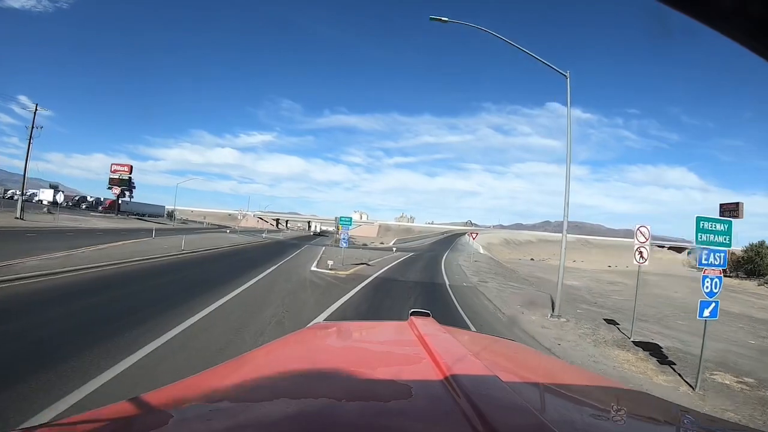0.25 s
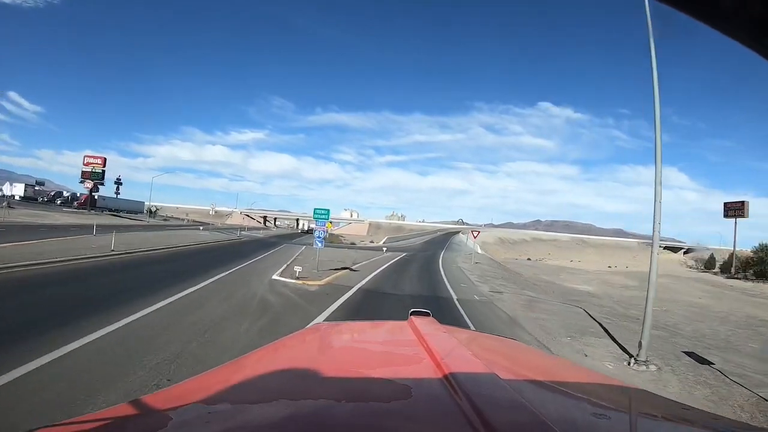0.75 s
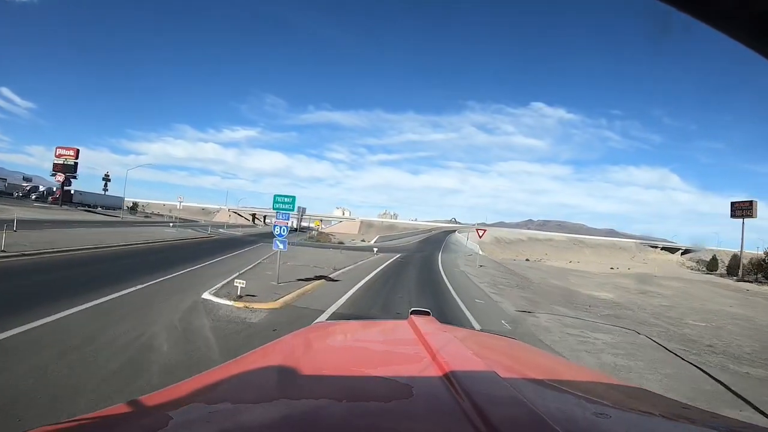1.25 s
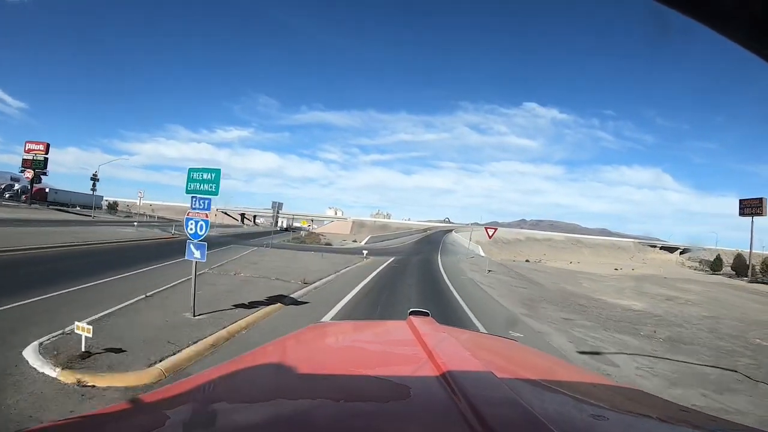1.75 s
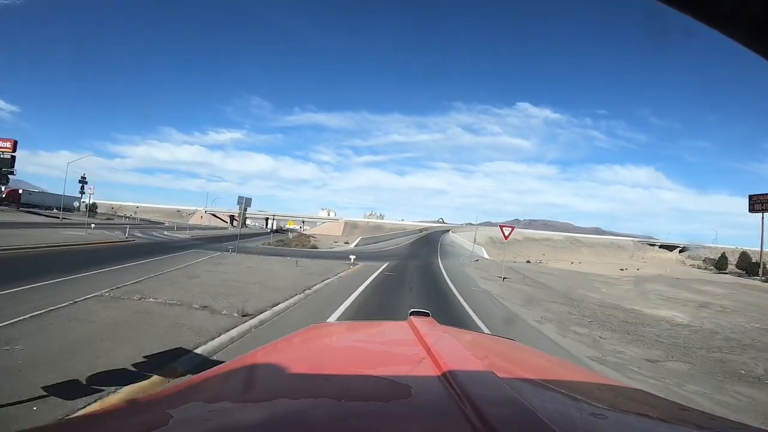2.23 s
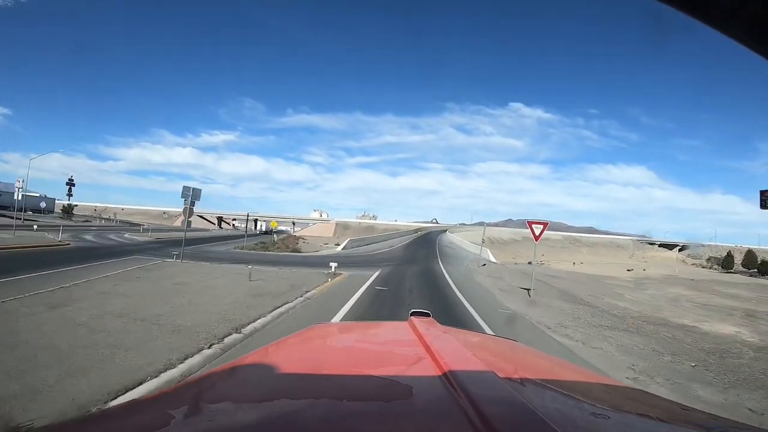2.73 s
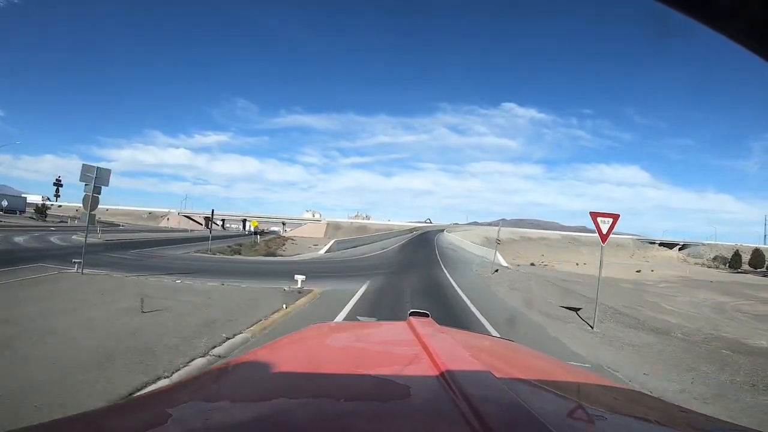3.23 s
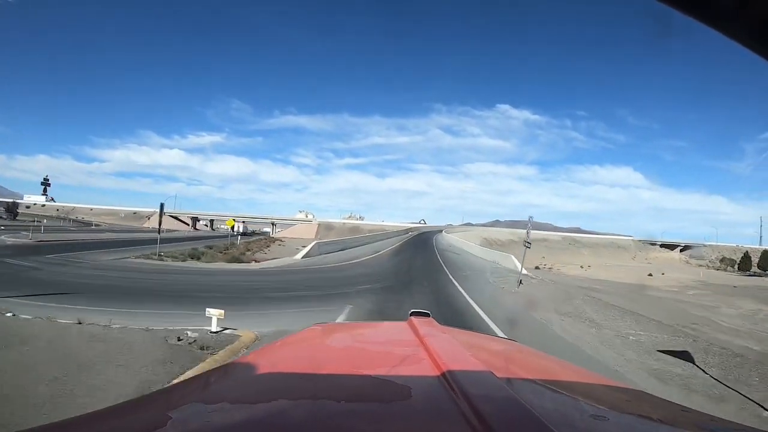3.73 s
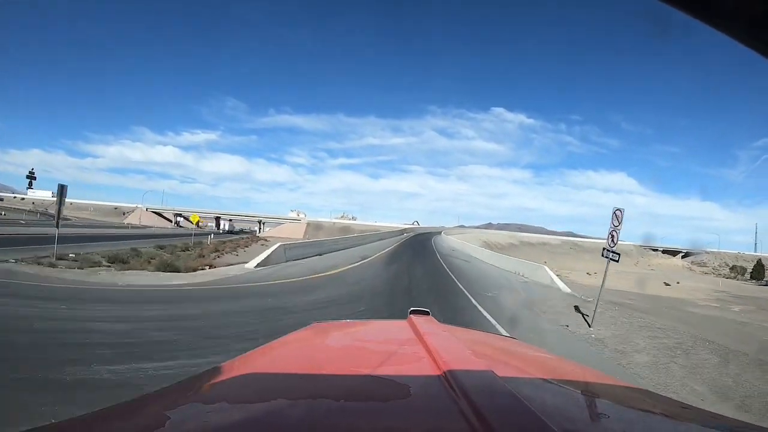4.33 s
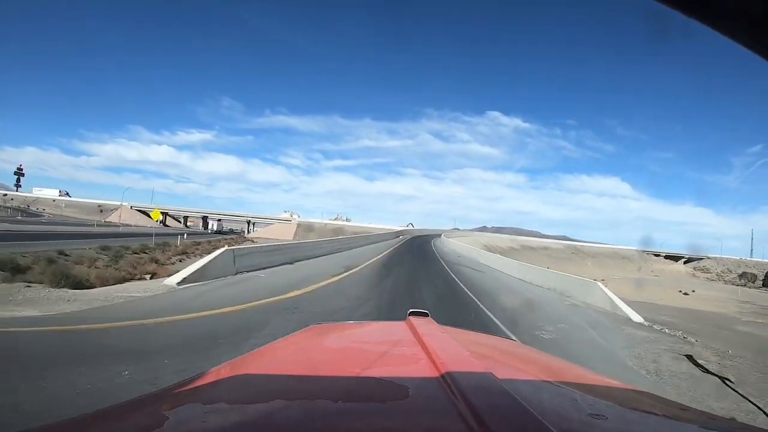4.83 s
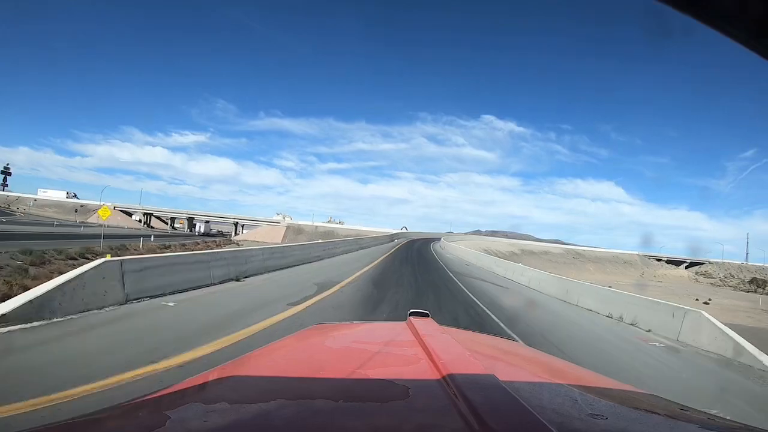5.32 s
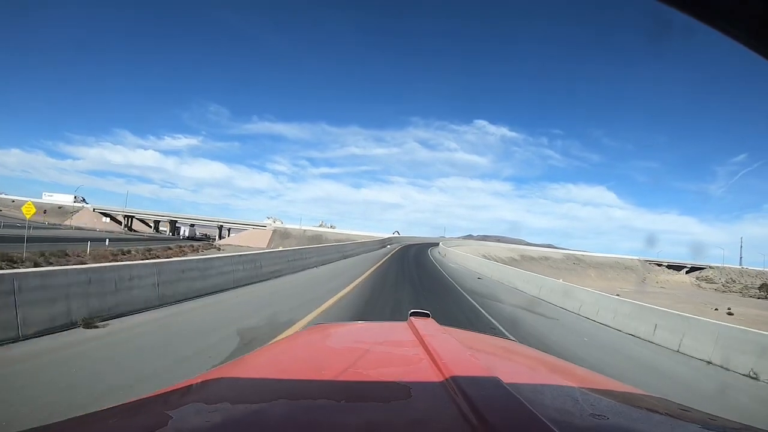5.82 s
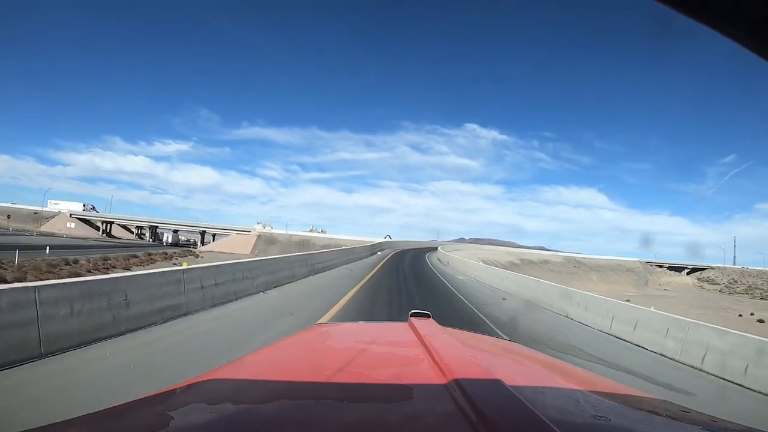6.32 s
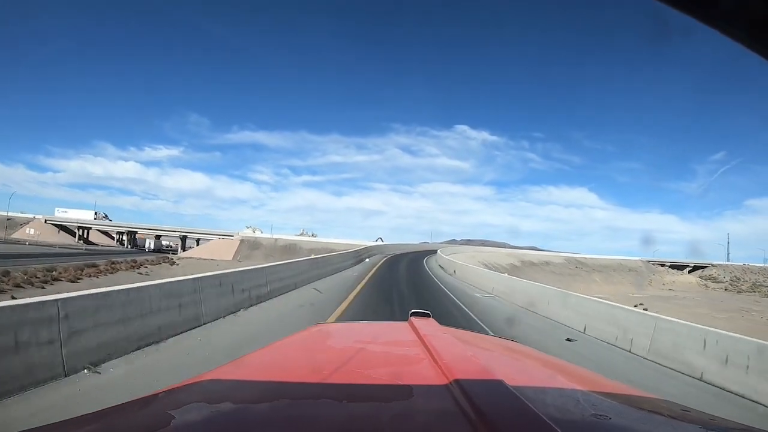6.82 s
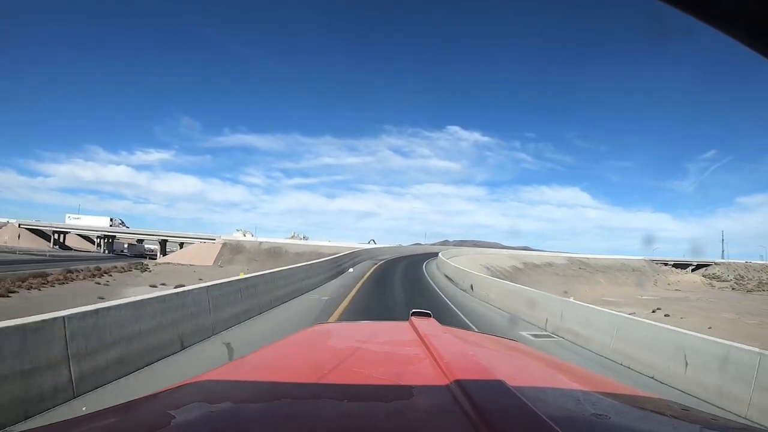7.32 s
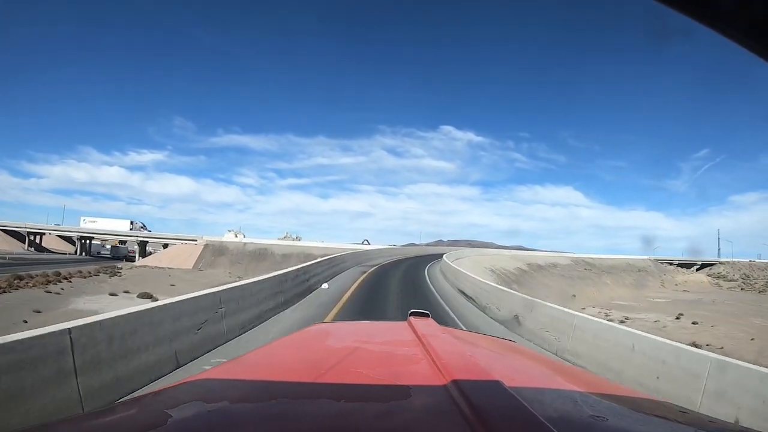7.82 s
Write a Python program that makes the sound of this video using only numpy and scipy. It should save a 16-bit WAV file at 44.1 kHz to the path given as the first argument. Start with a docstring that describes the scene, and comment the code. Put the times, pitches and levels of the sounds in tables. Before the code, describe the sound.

A heavy diesel truck accelerates, heard from inside the cab. The engine booms and clatters over a steady low road rumble, with a high turbo whistle above it. Twice the engine eases off for a gear shift, the whistle sinks, the throttle blips and the pull resumes with the whistle climbing again. Faint gear whine, thin panel ringing, small trim squeaks and ticks and a few short air puffs come through.

```python
"""A diesel truck from inside the cab.

A heavy six-cylinder engine pulls through two gear shifts. Its firing harmonics excite the cab's modes,
combustion clatter follows the load, gear teeth whine and two turbo stages whistle. Thin panels ring,
mostly on the right, while air valves puff and trim ticks and squeaks over the rumble of the road."""
import sys
import numpy as np
from scipy import signal
from scipy.fft import rfft, irfft
from scipy.io import wavfile
from scipy.ndimage import uniform_filter1d

SR = 44100
rng = np.random.default_rng(int(sys.argv[2]) if len(sys.argv) > 2 else 0)


def digitize_waveform(pressure):
    """Quantize a signal to 16-bit integers and store it at the path in sys.argv[1].

    Rows of a 2-D input are taken as channels; values are limited to [-1, 1].
    """
    field = np.atleast_2d(pressure).T
    bounded = np.clip(field, -1, 1)
    quanta = np.round(bounded * 32767).astype(np.int16)
    wavfile.write(sys.argv[1], SR, quanta)


N = 355446

# Noise field in the cab. Each row: frequency in Hz, left-right correlation.
COHERENCE = [(60, 0.86), (250, 1), (500, 0.8), (1000, 0.41), (2100, 0.41), (4400, 0.47), (9000, .0)]
# Balance of that field. Each row: frequency in Hz, left minus right in dB.
BALANCE = [(60, -1.5), (180, 1.5), (320, -3.5), (560, -5), (970, -0.7), (2900, -1.3), (9000, 0.5)]
# Standing waves in the cab. Each row: frequency in Hz, phase of right over left in radians.
STANDING_PHASE = [(60, 0.22), (160, .08), (250, 0.13), (400, 0.31)]
# Five noise spectra. Each row: frequency in Hz, relative spectral density in dB.
ROAD_SPECTRUM = [(20, -15.5), (30, 3), (55, -2.5), (80, -3.5), (110, 1.5), (180, -7), (250, -5.5),
                 (310, -15), (600, -27.5), (800, -26.5), (2100, -38), (4000, -51.5), (7000, -54),
                 (9500, -80.5), (16000, -100)]
HISS_SPECTRUM = [(4000, -30), (6000, -2), (8000, 0), (10500, -3), (11200, -22), (16000, -40)]
DULL_SPECTRUM = [(700, -23), (1600, -0.5), (2800, 3.5), (4500, -11.5), (7000, -10), (10000, -35.5),
                 (16000, -43.5)]
BRIGHT_SPECTRUM = [(1500, -29), (4000, 3.5), (6000, -1), (8500, 0), (10500, -8), (12500, -13.5),
                   (16000, -36.5)]
CLATTER_SPECTRUM = [(60, -7.5), (150, 2), (300, 4.5), (420, 0), (600, -9.5), (850, -7), (1100, -9),
                    (1400, -20), (1650, -15), (2800, -25), (3600, -29.5), (6000, -35.5), (8500, -42),
                    (11000, -79.5), (16000, -89.5)]
# Rubbing trim. Each row: centre in seconds, pitch in Hz, glide in Hz per second, peak in dB.
TRIM_SQUEAKS = [(1.245, 2420, -1500, -43), (1.45, 2420, 0, -48), (1.6, 2430, -1000, -42),
                (1.6, 4900, -7000, -51), (1.73, 2450, 0, -42), (2.905, 4700, 0, -50), (3.45, 4000, 0, -47),
                (3.895, 4200, 0, -45), (4.5, 2250, -2000, -44)]
# Air valves and trim ticks. Each row: start in seconds, level in dB before the envelope,
# decay time in seconds, bright share from 0 to 1, left minus right in dB.
PUFFS_AND_TICKS = [(1.472, -44, .005, .9, 7), (1.78, -38.5, 0.2, 0.36, -1), (2.47, -40, 0.0062, 0.88, 5),
                   (2.822, -45, 0.0078, 1, -5), (3.005, -46, 0.0076, 0.98, -4),
                   (3.168, -45, 0.012, 0.99, -1), (3.428, -31, 0.041, 0.67, 1), (3.893, -43, .012, .9, -2),
                   (4.006, -44, 0.009, .9, 4), (4.487, -45, 0.018, 0, 0), (6.4, -26, .012, 0.22, 3),
                   (7.248, -54, .015, 0.82, 0), (7.414, -54, .012, 0.76, 6), (7.663, -38, 0.027, 0.91, -1)]
# Swells of the loudest panel. Each row: centre in seconds, level in dB, half-width in seconds.
PANEL_BURSTS = [(.1, -46, 0.075), (0.54, -41.5, 0.1), (0.749, -42.5, 0.062), (.95, -41.5, 0.049),
                (1.492, -48, 0.065), (1.956, -50, 0.2), (2.422, -40.5, .14), (2.9, -54.5, 0.16),
                (3.402, -51.5, .08), (3.8, -41.5, 0.042), (4.198, -49.5, .1), (5.195, -44, 0.31),
                (5.949, -52, 0.084), (6.7, -45, 0.086), (7.6, -47, 0.044), (7.777, -41.5, 0.065)]
# Other panels. Each row: frequency in Hz, bandwidth in Hz, dB over load, left minus right in dB.
QUIET_PANELS = [(1739, 9, -17.5, -1), (2430, 20, -27, 0)]
# High-pressure turbo speed. Each row: time in seconds, whistle pitch in Hz.
TURBO_PITCH = [(0.0, 6350), (0.25, 7080), (0.4, 7260), (0.52, 7350), (0.66, 7370), (0.8, 7210), (1.0, 6410),
               (1.2, 5313), (1.4, 4590), (1.7, 4300), (2.0, 4400), (2.6, 5580), (3.3, 7290), (3.6, 7949),
               (3.8, 8120), (3.9, 8120), (4.0, 7882), (4.2, 6890), (4.4, 5834), (4.55, 5103), (4.72, 4603),
               (5.0, 4443), (5.4, 4876), (6.6, 7494), (6.9, 7944), (7.3, 8280), (7.7, 8520), (8.06, 8500)]
# Its whistle. Each row: pitch in Hz, level in dB spooling up, level in dB running down.
WHISTLE_LEVELS = [(4300, -75, -72), (4600, -72, -58), (5420, -69, -55.5), (5650, -57, -58),
                  (6130, -43, -52), (6450, -44.5, -49), (7110, -38.5, -48), (7370, -34.5, -40),
                  (7360, -37.5, -43.5), (7930, -40.5, -39), (8279, -43.5, -46), (8595, -49, -49)]
# Second turbo stage. Each row: pitch in Hz, level in dB.
BREATH_LEVELS = [(7200, -64), (9500, -65.5), (10700, -69), (11800, -80), (12500, -95)]
# Tooth meshes. Each row: multiple of the firing rate, relative level in dB, start and end in seconds.
GEAR_MESHES = [(35, 0, 0, 1.0), (35, 2.5, 1.75, 4.15), (35, -7, 4.9, 8.2), (70, -13, 1.9, 3.5),
               (70, -13, 4.6, 6.6), (52.3, -1, 1.75, 2.25), (52, -3, 5.0, 5.55), (48.8, -4, 6.5, 7.7),
               (17.2, 6, 5.6, 7.4)]
# Engine running. Each row: time in seconds, firing rate in Hz, load as a reference level in dB.
RATE_AND_LOAD = [(0.0, 73.9, -34.5), (0.4, 77.5, -36), (0.65, 78.06, -37.5), (0.9, 77.5, -41),
                 (1.1, 74.02, -43), (1.4, 65.3, -45.5), (1.5, 66.27, -40), (1.6, 69.82, -41.5),
                 (1.72, 71.0, -37), (1.85, 67.5, -38), (1.92, 69.3, -35), (2.2, 70.45, -35.5),
                 (2.8, 74.0, -34), (3.3, 78.37, -34.5), (3.65, 80.5, -37), (3.85, 80.9, -38.5),
                 (4.08, 78.87, -40), (4.2, 76.66, -46), (4.7, 66.63, -44.5), (4.9, 71.4, -37.5),
                 (5.05, 67.28, -38.5), (5.12, 68.64, -35), (5.7, 70.26, -36.5), (6.4, 73.4, -34.8),
                 (7.4, 77.18, -36), (8.06, 78.8, -37)]
# Gear shifts. Each row: times in seconds at which the foot lifts, throttle blips and clutch catches.
SHIFT_TIMES = [(1.003, 1.53, 1.8), (4.13, 4.78, 4.97)]
# Cab modes. Each row: centre in Hz, bandwidth in Hz, peak in dB over load.
CAB_MODES = [(107, 8.4, 1.5), (134, 20, -2.5), (161.4, 17, 8.5), (212.3, 12, 7), (238, 39, -1.5),
             (428, 38, -7), (480, 29, -13.5)]
# Upper engine orders. Each row: multiple of the firing rate, dB over load before the cab resonance.
UPPER_ORDERS = [(5, 6.8), (6, 2.4), (16 / 3, -2), (13 / 3, 0.82), (6.4, -8.5)]
MAIN_ORDERS = (1, 2, 3, 11 / 3, 4, 8 / 3)  # multiples of the firing rate; 11/3 is the fan blade tone
# Pulling at full load. Each row: firing rate in Hz, then the level in dB of each main order.
PULLING_DB = [(67.6, -18.5, -26, -22.5, -23, -27, -41), (69.6, -19, -18.5, -19, -22, -27.5, -41),
              (71.52, -19, -23, -19.5, -26, -33, -41.5), (73.37, -19, -27, -17.5, -34.5, -31.5, -38),
              (75.2, -21, -20.5, -19.5, -40.5, -29, -28), (76.2, -23, -19, -16.5, -41.5, -31, -24.5),
              (77.5, -28.5, -13, -15.5, -42.5, -31, -24), (77.95, -26, -12, -19, -45, -27, -25.5),
              (78.92, -25, -12, -18.5, -41, -29, -25), (80.4, -29, -11, -19.5, -28, -28, -34)]
# Part load. Each entry: dB that a main order loses per dB below full load.
LOAD_SLOPES = [.8, 0.33, 2.35, 0.51, 0.67, 1.3]
# Three stages of a shift. Each entry: level in dB of a main order.
COASTING_DB = [-30.5, -31, -43, -29, -47, -41.5]
BLIPPING_DB = [-23.5, -18, -27.5, -22, -42, -35.5]
CATCHING_DB = [-20, -30, -27, -26, -20, -39]

ROAD_DB, HISS_DB, FULL_LOAD_DB = -23, -64.5, -35.4
CLATTER_DB, GEAR_DB, PANEL_DB = 9, -20.5, -13  # over load
TIME = np.arange(N) / SR


def undb(db):
    """Amplitude grows tenfold for every 20 dB."""
    return 10 ** (np.asarray(db) / 20)


def per_sample(table):
    """Linear interpolation gives each column of a timed table a value at every sample."""
    times, *columns = np.transpose(table)
    return [np.interp(TIME, times, column) for column in columns]


def per_bin(table):
    """Interpolation on a logarithmic frequency axis gives a value at every Fourier bin."""
    hz, value = np.transpose(table)
    return np.interp(np.log(np.fft.rfftfreq(N, 1 / SR) + 1), np.log(hz), value)


def waver(rate_hz):
    """Random steps, smoothed twice, form a slow fluctuation of unit deviation."""
    hold = int(SR / rate_hz)
    steps = np.repeat(rng.standard_normal(N // hold + 1), hold)
    smooth = uniform_filter1d(uniform_filter1d(steps, hold), hold)[:N]
    return smooth / smooth.std()


def band_envelope(width_hz):
    """Modulation by this complex noise of unit rms spreads a pure tone into a band."""
    noise = rng.standard_normal(N) + 1j * rng.standard_normal(N)
    noise = signal.sosfilt(signal.butter(2, width_hz / 2, fs=SR, output="sos"), noise)
    return noise / np.sqrt(np.mean(abs(noise) ** 2))


def phasor(hz):
    """Phase is the integral of frequency; the result is a unit complex tone."""
    return np.exp(2j * np.pi * np.cumsum(hz) / SR)


def breathy_band(hz, width_hz):
    """Independent random modulation in each channel gives an incoherent band around a pitch."""
    return (phasor(hz) * np.array([band_envelope(width_hz) for _ in "LR"])).real


def cab_noise(spectrum, gate=1.):
    """A noise field of unit rms, coherent between two points in the bass but not in the treble."""
    mid, side = rfft(gate * rng.standard_normal((2, N)))
    coherence, lean_db = per_bin(COHERENCE), per_bin(BALANCE) / 2
    mid, side = mid * np.sqrt(1 + coherence), side * np.sqrt(1 - coherence)
    channels = np.array([(mid + side) * undb(lean_db), (mid - side) * undb(-lean_db)])
    noise = irfft(channels * undb(per_bin(spectrum)), N)
    return noise / noise.std()


def resonance(hz, centre_hz, width_hz, peak_db):
    """The power response of a damped mode follows a Lorentzian curve."""
    return undb(2 * peak_db) / (1 + (2 * (hz - centre_hz) / width_hz) ** 2)


def standing_phase(hz):
    """Standing waves shift the phase of the right channel against the left."""
    return np.array([[0], [1]]) * np.interp(hz, *np.transpose(STANDING_PHASE))


def road():
    """Broadband noise: the road rumbles in the bass, wind and tyres hiss in the treble."""
    rumble = cab_noise(ROAD_SPECTRUM) * undb(ROAD_DB + 1.2 * waver(5))
    hiss = cab_noise(HISS_SPECTRUM) * undb(HISS_DB + .87 * waver(4))
    return rumble + hiss


def trim_squeaks(half_width_s=.016):
    """Friction in the trim gives brief chirps under Gaussian envelopes."""
    out = 0
    for centre, hz, glide, db in TRIM_SQUEAKS:
        t = TIME - centre
        envelope = undb(db) * np.exp(-(t / half_width_s) ** 2)
        out = out + envelope * np.sin(2 * np.pi * (hz + glide * t / 2) * t)
    return out


def puffs_and_ticks():
    """Air valves and ticking trim emit noise transients; the longer ones open more slowly."""
    dull, bright = cab_noise(DULL_SPECTRUM), cab_noise(BRIGHT_SPECTRUM)
    out = 0
    for start, db, decay_s, share, pan_db in PUFFS_AND_TICKS:
        rise_s = max(.0005, .02 * (decay_s / .1) ** 2)
        age = np.clip(TIME - start, 0, None)
        envelope = (1 - np.exp(-age / rise_s)) * np.exp(-(age / decay_s) ** 2)
        gain = undb([[db + pan_db / 2], [db - pan_db / 2]])
        out = out + envelope * gain * (share * bright + (1 - share) * dull)
    return out


def panel_mode(hz, width_hz, pan_db):
    """A lightly damped mode under random forcing rings in a narrow band."""
    swing = band_envelope(width_hz)
    swing /= abs(swing) ** .5  # the swing evens out as the damping grows with it
    tone = (swing * np.exp(2j * np.pi * hz * TIME)).real
    return tone / tone.std() * undb([[pan_db / 2], [-pan_db / 2]])


def panels(load):
    """Forced vibration of thin panels follows the load; the loudest also swells in bursts."""
    bursts = sum(undb(db) * np.exp(-((TIME - centre) / span) ** 2) for centre, db, span in PANEL_BURSTS)
    level = (bursts + load * undb(PANEL_DB)) * undb(2.4 * waver(28))
    out = level * panel_mode(hz=1561, width_hz=10, pan_db=-13)
    for hz, width_hz, db, pan_db in QUIET_PANELS:
        out = out + load * undb(db + 6 * waver(3.509)) * panel_mode(hz, width_hz, pan_db)
    return out


def turbo_whistle(hz):
    """A blade-passing tone is firm while the wheel is driven and breaks up as it runs down."""
    blade_tone = phasor(hz * (1 + .003 * waver(25)))
    fall_hz_per_s = -uniform_filter1d(np.gradient(hz), 4000) * SR
    coast = np.clip(fall_hz_per_s / 4500, 0, 1)
    pitch, up_db, down_db = np.transpose(WHISTLE_LEVELS)
    down = np.sqrt(coast)
    db = (1 - down) * np.interp(hz, pitch, up_db) + down * np.interp(hz, pitch, down_db)
    firmness = .78 * (1 - .9 * coast)
    right_phase = np.array([[0], [1]]) * (2.16 + 1.5 * waver(6))
    steady = firmness * np.exp(1j * right_phase)
    flutter = np.sqrt(1 - firmness ** 2) * np.array([band_envelope(width_hz=140) for _ in "LR"])
    flicker_db = 2 * (1 + .76 * coast) * waver(22)
    whistle = undb(db + flicker_db) * (blade_tone * (steady + flutter)).real
    # running down, surging air spreads a band just below the whistle
    surge = coast ** 2 * undb(db - 7) * breathy_band(.93 * hz, width_hz=800)
    return whistle + surge


def turbo_breath(whistle_hz, ratio=1.66):
    """The second stage turns in step with the first, so its noise band keeps a constant pitch ratio."""
    hz = ratio * whistle_hz
    return undb(np.interp(hz, *np.transpose(BREATH_LEVELS))) * breathy_band(hz, width_hz=550)


def gear_whine(phase, load):
    """Meshing teeth sound at multiples of the firing rate, coming and going with the torque."""
    out = 0
    for order, db, start, end in GEAR_MESHES:
        gate = np.clip(np.minimum(TIME - start, end - TIME) / .1, 0, 1)
        level = load * undb(GEAR_DB + db + 3.5 * waver(16)) * gate
        out = out + level * np.sin(order * phase + np.array([[0], [1.2]]))
    return np.sqrt(2) * out


def combustion_clatter(phase, load, decay_periods=.5, depth=.44):
    """Amplitude modulation: combustion noise jumps at each firing and fades before the next."""
    knock = np.exp(-(phase / (2 * np.pi) % 1) / decay_periods)
    return cab_noise(CLATTER_SPECTRUM, gate=1 + depth * knock) * load * undb(CLATTER_DB)


def order_levels(hz, load_db, catch_s=.14, fade_s=.08):
    """Pulling, each main order swells as it sweeps a cab resonance; in a shift the stage sets its dB."""
    rates, *levels = np.transpose(PULLING_DB)
    full_load = np.array([np.interp(hz, rates, level) for level in levels])
    db = pulling = full_load + np.outer(LOAD_SLOPES, np.minimum(load_db - FULL_LOAD_DB, 0))
    for lift, blip, catch in SHIFT_TIMES:
        stages = (lift, COASTING_DB), (blip, BLIPPING_DB), (catch, CATCHING_DB), (catch + catch_s, pulling)
        for start, stage_db in stages:
            fade = np.clip((TIME - start) / fade_s, 0, 1)
            db = db + fade * (np.reshape(stage_db, (len(db), -1)) - db)
    return db


def engine_boom(hz, phase, load_db):
    """Periodic firing and the fan give tones tied to engine speed, which the cab's modes colour."""
    load, out = undb(load_db), 0
    for order, db in zip(MAIN_ORDERS, order_levels(hz, load_db)):
        tone = np.sin(order * phase + order + standing_phase(order * hz))
        out = out + undb(db + .7 * waver(11)) * tone
    for order, db in UPPER_ORDERS:
        boom = np.sqrt(.025 + resonance(order * hz, centre_hz=394, width_hz=19.4, peak_db=0))
        out = out + load * boom * undb(db + 2.5 * waver(4)) * np.sin(order * phase)
    # six uneven cylinders fill in the sixths between the firing harmonics
    for order in [sixth / 6 for sixth in range(3, 40) if sixth % 6]:
        power = sum(resonance(order * hz[::64], *mode) for mode in CAB_MODES)
        gain = np.repeat(np.sqrt(power), 64)[:N] * undb(1.8 * waver(2.5))
        offset = 2 * np.pi * rng.random() + standing_phase(order * hz[0])
        out = out + load * gain * np.sin(order * phase + offset)
    return np.sqrt(2) * out * undb([[-.3], [.3]])


def scene():
    """By superposition, engine, turbos, small sounds and road add in the two channels."""
    firing_hz, load_db = per_sample(RATE_AND_LOAD)
    turbo_hz, = per_sample(TURBO_PITCH)
    phase = 2 * np.pi * np.cumsum(firing_hz * (1 + .001 * waver(14))) / SR
    load = undb(load_db)
    clatter = combustion_clatter(phase, load)
    background = road()
    engine = engine_boom(firing_hz, phase, load_db) + clatter + gear_whine(phase, load) + panels(load)
    turbos = turbo_whistle(turbo_hz) + turbo_breath(turbo_hz)
    return background + puffs_and_ticks() + trim_squeaks() + turbos + engine


def record(dry, low_hz=22, top_hz=14600, drive=.9):
    """The microphone passes a limited band, and its soft saturation rounds the loudest peaks."""
    lead = 4096  # samples that settle the filters
    padded = np.pad(dry, ((0, 0), (lead, 0)), mode="reflect", reflect_type="odd")
    bass_cut = signal.sosfilt(signal.butter(2, low_hz, "high", fs=SR, output="sos"), padded)
    rounded = np.tanh(drive * bass_cut) / drive
    return signal.sosfilt(signal.ellip(8, .2, 70, top_hz, fs=SR, output="sos"), rounded)[:, lead:]


dry = scene()
out = record(dry)
digitize_waveform(out)
```